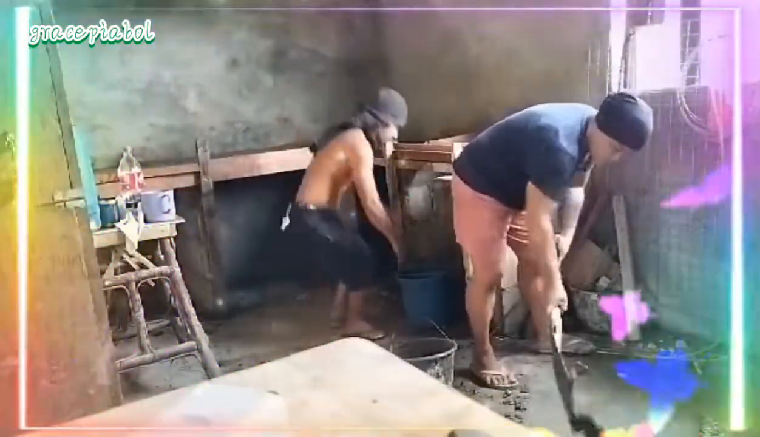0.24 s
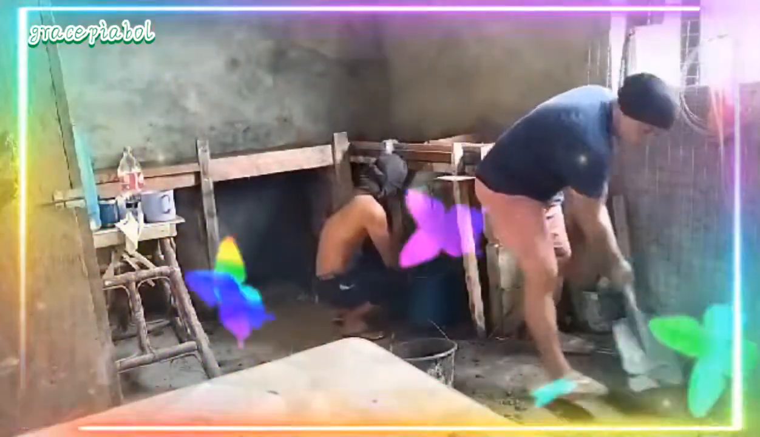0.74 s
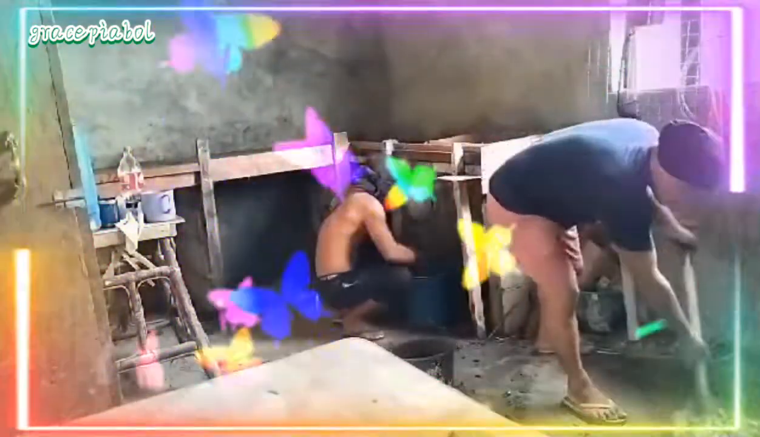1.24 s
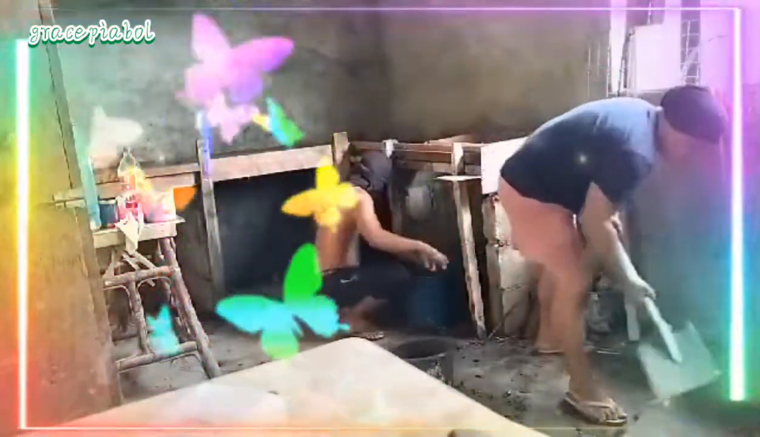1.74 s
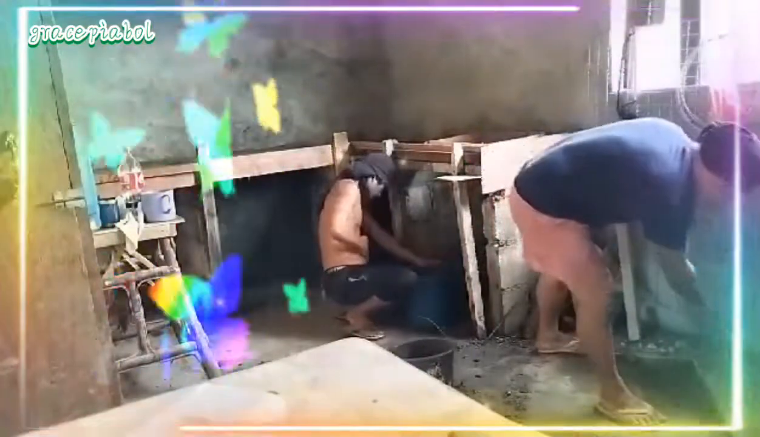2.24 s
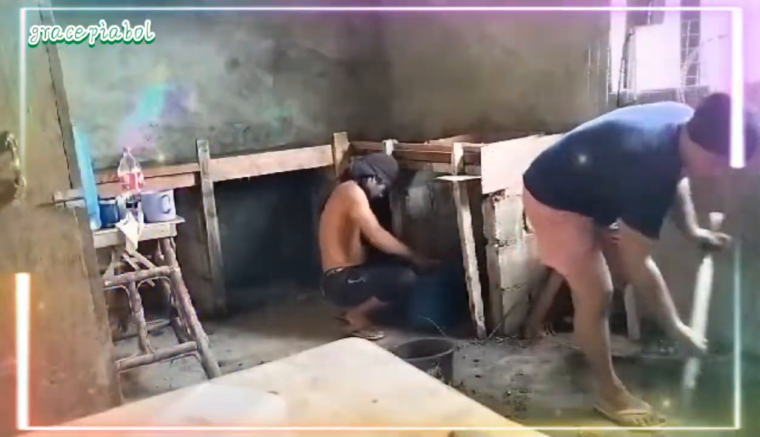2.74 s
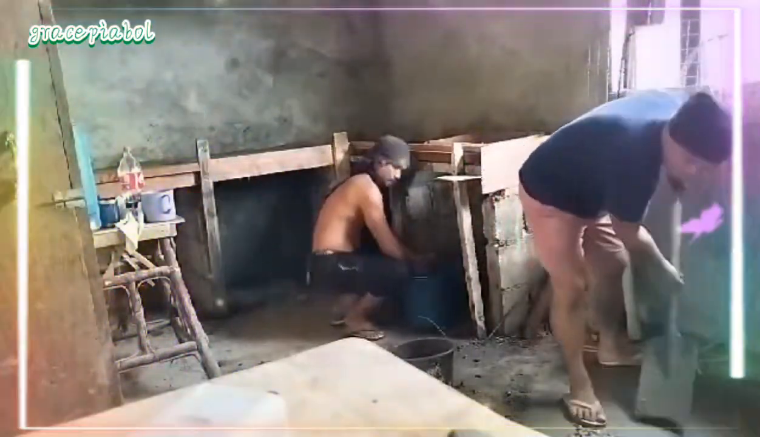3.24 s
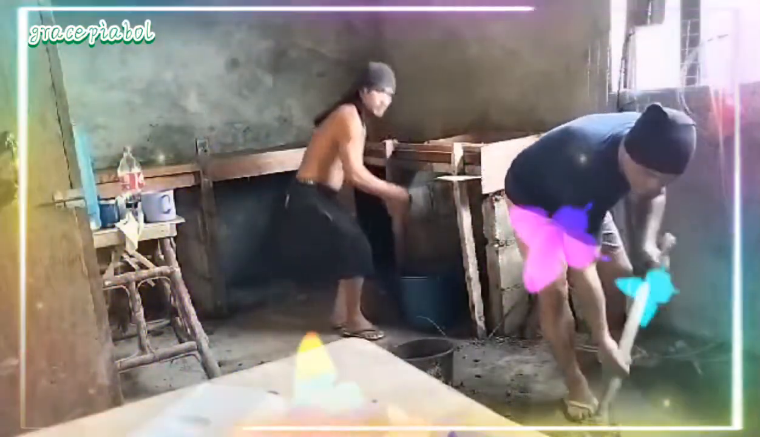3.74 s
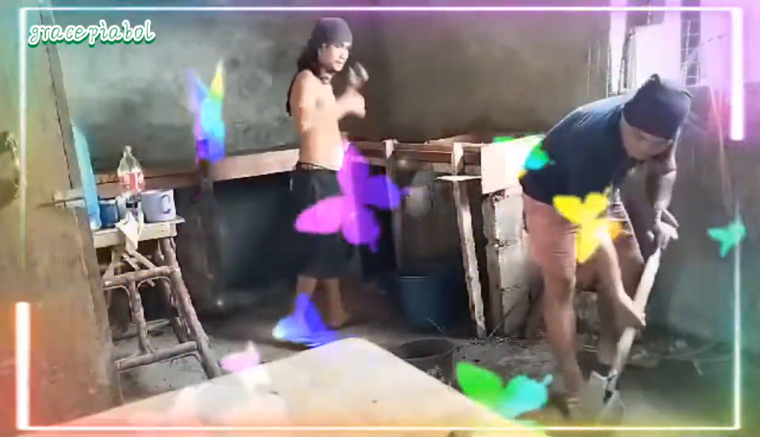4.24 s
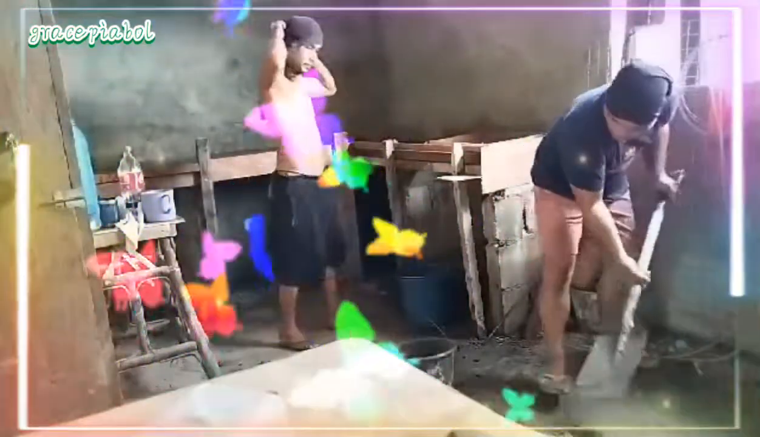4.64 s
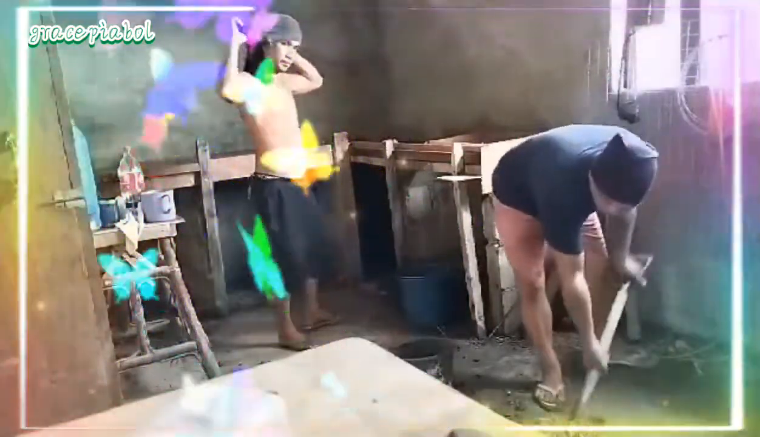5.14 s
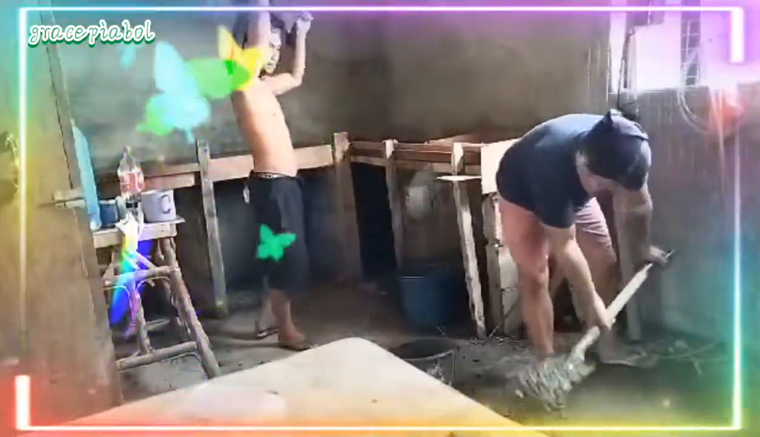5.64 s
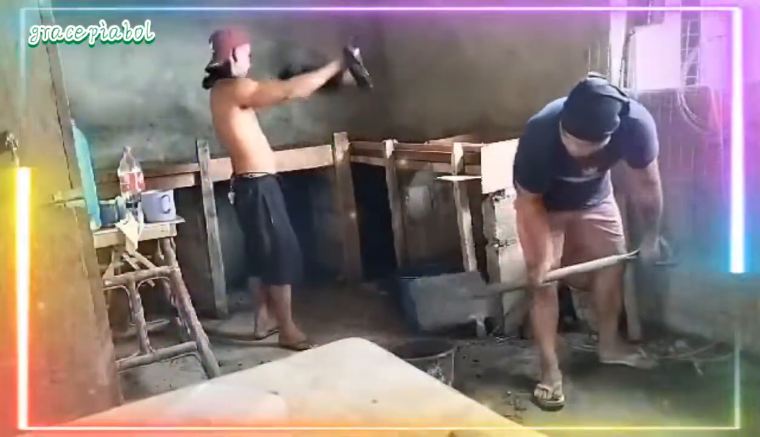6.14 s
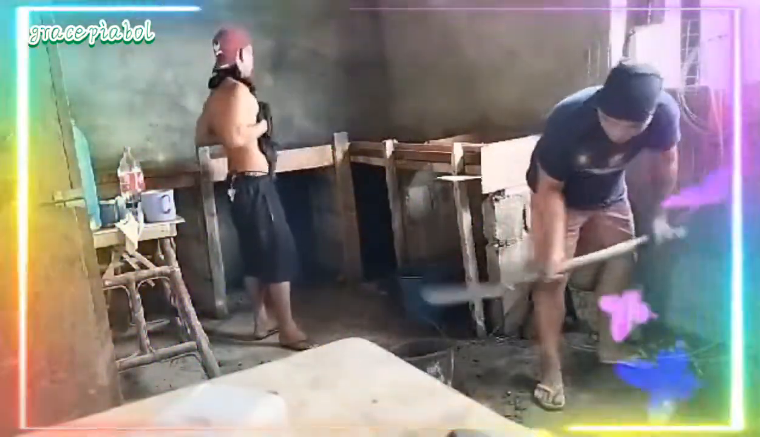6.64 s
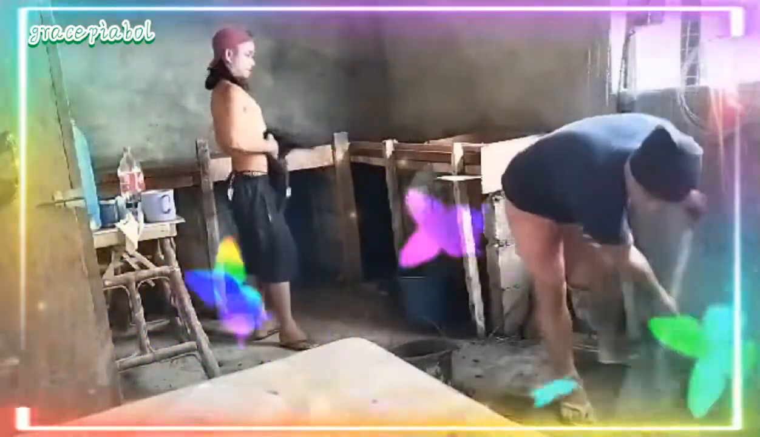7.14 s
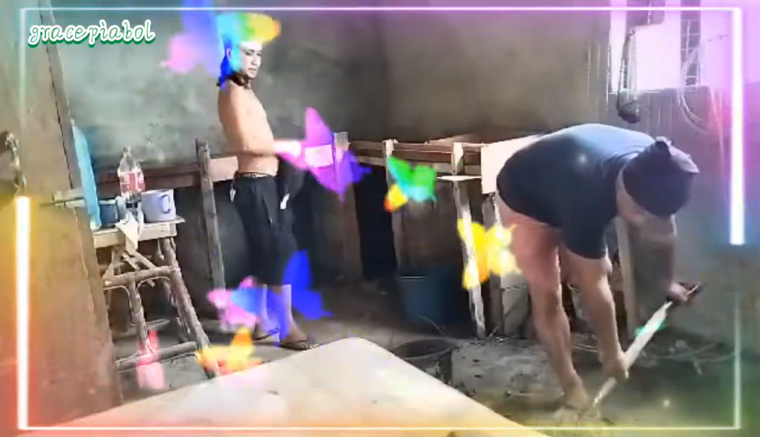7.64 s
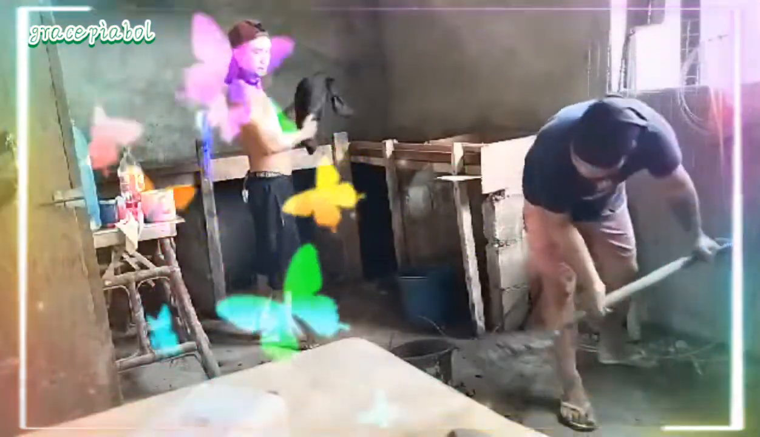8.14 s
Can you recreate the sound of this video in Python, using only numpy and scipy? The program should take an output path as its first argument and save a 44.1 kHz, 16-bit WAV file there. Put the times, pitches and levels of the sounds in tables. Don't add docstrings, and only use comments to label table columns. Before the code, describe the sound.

A steel shovel works wet gravel on concrete inside a small bare room with short, hard reverberation, heard in stereo mostly off the walls. At 0 s a few last stones fall; light chops and small scuffs follow until 0.8. From 0.9 to 1.4 a gritty push rasps, stones snapping, the blade booming downward in pitch. A second scrape comes at 2.0-2.5, then light dragging. At 3.3-3.6 a harder push grinds with a heavy floor thud. At 4.1 comes the hardest, sharpest bite, then at 4.8-5.1 another scrape with sprayed sand. It quiets to faint drags, with a light tap at 5.9. At 6.25-6.4 the load tips with a loud hollow metal clank; at 7.0-7.4 gravel slides in a bright, swelling rasp. Faint scuffs fade to about 8.4. Throughout, a distant low motor wavers, with soft air noise and thin high insect hiss; a second motor rises briefly near 5.7.

```python
import sys
import numpy as np
from scipy import signal
from scipy.io import wavfile
from scipy.ndimage import uniform_filter1d

SR = 44100
rng = np.random.default_rng(int(sys.argv[2]) if len(sys.argv) > 2 else 0)


def generate_wav(signal):
    frames = np.transpose(np.atleast_2d(signal))
    scaled = np.clip(frames, -1, 1) * 32767
    pcm = np.round(scaled).astype(np.int16)
    wavfile.write(sys.argv[1], SR, pcm)


def level_to_linear(level):
    exponent = np.asarray(level, float) / 20
    return 10 ** exponent


N = 370440
T = np.arange(N) / SR
TICKS = T[::44]

# mode_hz, width_hz, level_db
BLADE_MODES = [(211.4, 22, 3), (263.1, 13, 2), (315.4, 10, -3.5), (350.2, 37, 1.5), (406.2, 41, 1.5),
               (456.6, 72, 1.5), (512, 90, 7.5), (562.4, 35, 2.5), (629.6, 58, 9.5), (683.4, 28, 2),
               (776, 25, 8.5), (868, 77, 12.5), (980, 84, 14), (1090, 71, -16.5), (1480, 140, -35.5)]


def shovel():
    # frequency_hz, density_db (per Hz)
    grit_spectrum = [(410, -54.5), (700, -18), (754, -0.5), (943, -2), (1590, -2.5), (2220, -3), (2920, -8),
                     (3600, -6.5), (5560, -14), (5990, -15), (10600, -15), (12900, -16), (13600, -84)]
    # mode_hz, width_hz, level_db
    slab_modes = [(78, 29, -18), (100, 57, -10.5), (132, 49, 11), (169, 18, 3.5)]
    grit_db, fizz_db, lean_db = grit_pressure()
    thud_db = slab_load()
    judder = level_to_linear(0.36 * wander(18) + 1.27 * wander(45) + 2.24 * wander(140))
    sand = slips(3400, spread_db=4.0) * judder
    gravel = slips(1500, spread_db=3.5) * judder

    edge = lip(colour(sand, grit_spectrum))
    grit = level_to_linear(lean_db) * band(edge, 760, 1793) - band(edge, 1755, 5770)
    grit *= level_to_linear(grit_db) / np.std(band(edge, 870, 3400))
    grit += level_to_linear(grit_db - 6.0) * judder * chips(892, 4600, cycles=9)
    fizz_db = np.minimum(fizz_db, -.3 * (grit_db + 36))
    fizz = level_to_linear(grit_db + fizz_db + 0.27 * wander(22.15)) * evened(band(edge, 5140, 14100))

    shake = evened(gravel) + 0.49 * evened(sand)
    blade = np.zeros(N)
    for level, (hz, width, _) in zip(mode_levels(), BLADE_MODES):
        blade += level * evened(ring(ring(shake, hz, 1.4 * width), hz, 4 * width))
    boom = belly(evened(sand / judder) + .3 * shake)
    floor = sum(level_to_linear(db) * ring(shake, hz, width) for hz, width, db in slab_modes)
    thud = level_to_linear(thud_db - 7.5) * evened(band(floor, 60, 212))
    return grit + fizz + blade + boom + thud


def grit_pressure():
    # start_s, rise_s, hold_s, peak_db, hold_end_db
    scrapes = [
        (.901, 0.11, 0.086, -22.5, -26.5),
        (1.06, 0.039, 0.23, -26, -32.5),
        (2.01, 0.16, 0.27, -22.5, -28),
        (3.325, 0.0077, 0.048, -22, -27.5),
        (3.372, 0.0066, 0.2, -15, -30),
        (4.824, 0.0047, 0.034, -23, -37),
        (4.86, 0.067, 0.16, -20.5, -29),
    ]
    # start_s, rise_s, hold_s, peak_db, hold_end_db
    tips = [
        (0, 0.001, 0.0029, -21.5, -37),
        (.11, 0.07, .02, -48, -49.5),
        (6.285, 0.035, 0.0077, -38, -27),
        (6.347, 0.02, 0.034, -25.5, -27),
        (6.48, 0.061, 0.026, -40.5, -53),
    ]
    # start_s, rise_s, hold_s, peak_db, hold_end_db
    chops = [
        (.236, 0.031, 0.05, -35, -39.5),
        (.414, 0.012, 0.054, -41.5, -45),
        (1.768, 0.01, 0.16, -39, -57),
        (1.894, 0.0047, 0.017, -47, -49),
        (2.99, 0.027, 0.29, -34.5, -55.5),
        (4.11, 0.02, 0.034, -21, -24),
        (4.143, 0.011, 0.047, -9, -25),
        (4.59, 0.015, 0.23, -56, -63),
        (5.882, 0.005, 0.0094, -28.5, -42),
    ]
    # start_s, rise_s, hold_s, peak_db, hold_end_db
    scuffs = [
        (.489, 0.003, 0.027, -33.5, -45),
        (.49, .005, 0.17, -42.5, -65),
        (.77, .012, 0.11, -46, -64),
        (3.885, 0.011, 0.013, -32, -40),
        (6.862, 0.019, 0.025, -45, -49.5),
        (7.8, 0.022, 0.045, -43, -47),
        (7.995, 0.0074, 0.1, -49, -61),
    ]
    # start_s, rise_s, hold_s, peak_db, hold_end_db
    drags = [(1.35, 0.088, 0.13, -38.5, -37), (2.43, 0.02, 0.17, -36, -40.5),
             (2.6, 0.063, 0.25, -40.5, -37.5), (3.6, 0.11, 0.46, -39, -38), (5.2, 0.05, 0.17, -50, -51.5),
             (5.45, 0.14, 0.24, -48.5, -51.5), (5.7, 0.047, 0.1, -53.5, -49.5),
             (6.1, 0.08, 0.028, -65, -59.5), (6.6, 0.055, 0.22, -59, -57), (6.93, .03, .06, -57, -48),
             (7.42, 0.058, 1, -46, -76.5)]
    # start_s, rise_s, hold_s, peak_db, hold_end_db
    sprays = [
        (.74, 0.013, 0.047, -46.5, -61.5),
        (1.56, 0.019, 0.034, -41, -42.5),
        (1.85, 0.024, .02, -45, -47.5),
        (3.76, 0.014, 0.044, -32.5, -49),
        (4.89, 0.058, 0.13, -33, -35),
        (6.51, 0.024, 0.038, -40, -49.5),
        (7.87, 0.012, 0.023, -50, -55.5),
    ]
    # start_s, rise_s, hold_s, peak_db, hold_end_db
    dumps = [
        (6.24, 0.0055, 0.026, -40.5, -45.5),
    ]
    # start_s, rise_s, hold_s, peak_db, hold_end_db
    slides = [
        (7.018, 0.054, 0.02, -33.5, -36),
        (7.058, 0.044, 0.068, -24.5, -24),
        (7.14, 0.063, 0.15, -21, -30),
    ]
    parts = [
        contact(scrapes, bite_db=9.9, release_db_per_s=170, fizz_db=-7, lean_db=0.48, drift_db_per_s=11),
        contact(tips, bite_db=1.9, release_db_per_s=144, fizz_db=-10, lean_db=6.4, drift_db_per_s=4),
        contact(chops, bite_db=4.8, release_db_per_s=136, fizz_db=-14, lean_db=-6, drift_db_per_s=-16.5),
        contact(scuffs, bite_db=4, release_db_per_s=270, fizz_db=-6, lean_db=-1.5, drift_db_per_s=-10),
        contact(drags, bite_db=7.1, release_db_per_s=91, fizz_db=-9, lean_db=6, drift_db_per_s=-16),
        contact(sprays, bite_db=8.8, release_db_per_s=121, fizz_db=3.5, lean_db=2.5, drift_db_per_s=-2),
        contact(dumps, bite_db=7.8, release_db_per_s=150, fizz_db=-14.5, lean_db=17, drift_db_per_s=-0.6),
        contact(slides, bite_db=9, release_db_per_s=225, fizz_db=-7, lean_db=-3.5, drift_db_per_s=33),
    ]
    power, fizz, lean = np.concatenate(parts, axis=1)
    return blend(power, -72.5, fizz, lean)


def contact(rows, bite_db, release_db_per_s, fizz_db, lean_db, drift_db_per_s):
    rows = np.array(rows)
    sag_db_per_s = (rows[:, 3] - rows[:, 4]) / rows[:, 2]
    power, since = efforts(rows, bite_db, sag_db_per_s[:, None], release_db_per_s)
    return power, fizz_db + 0 * power, lean_db + drift_db_per_s * since


def mode_levels():
    # start_s, rise_s, hold_s, peak_db, centre_hz
    rattles = [(0, 0.0018, .005, -33.5, 520), (.23, 0.062, .012, -40, 606), (.901, 0.0029, 0.18, -26, 480),
               (1.05, 0.044, 0.2, -25, 566), (1.42, 0.044, 0.24, -38.5, 480), (2.01, 0.23, 0.3, -26, 476),
               (2.58, 0.025, 0.6, -33, 415), (3.33, 0.086, 0.12, -21.5, 470),
               (3.62, 0.014, 0.14, -32.5, 296), (3.78, 0.049, 0.23, -36.5, 467),
               (4.114, 0.023, 0.017, -20, 450), (4.824, 0.13, 0.14, -25.5, 510),
               (5.87, 0.015, 0.0054, -44.5, 400), (6.237, 0.0071, 0.02, -27.5, 493),
               (6.345, 0.005, 0.014, -13, 560), (6.5, 0.024, 0.15, -43, 435), (7.08, 0.17, 0.1, -26, 544),
               (6.965, 0.0066, 0.094, -39, 396), (1.85, 0.017, 0.17, -47, 326), (5.45, .05, 0.37, -46, 472),
               (7.65, 0.043, 0.064, -44, 483)]
    # start_s, rise_s, hold_s, peak_db, centre_hz
    booms = [(1.11, 0.042, 0.05, -27, 770), (1.132, .01, .06, -25.5, 500), (6.258, .008, 0.018, -25.5, 400),
             (4.145, .01, .05, -24, 200), (3.39, 0.015, 0.04, -24, 830), (3.455, 0.012, 0.071, -17.5, 334),
             (6.355, .012, 0.051, -14.5, 640), (7.19, 0.048, 0.036, -30, 800),
             (4.13, 0.032, 0.023, -27, 220), (7.03, 0.056, 0.065, -36, 215),
             (0.968, 0.027, 0.072, -30, 268), (2.06, 0.041, 0.13, -31.5, 270),
             (4.92, 0.042, 0.174, -33.5, 336), (6.35, 0.012, 0.029, -11, 454)]
    # start_s, rise_s, hold_s, peak_db, centre_hz
    hums = [
        (8.1, 0.2, .15, -71, 568.1),
    ]
    mode_hz, _, mode_db = np.transpose(BLADE_MODES)[..., None, None]
    modes = level_to_linear(2 * -64) / len(BLADE_MODES)

    def excited(rows, bite_db, sag_db_per_s, release_db_per_s, spread, glide_per_s):
        rows = np.array(rows)
        power, since = efforts(rows, bite_db, sag_db_per_s, release_db_per_s)
        away = np.log(mode_hz / rows[:, 4:]) - glide_per_s * since
        reach = (level_to_linear(mode_db) * (.015 + np.exp(-(away / spread) ** 2))) ** 2
        return (power * reach / reach.sum(0)).sum(1)

    modes = modes + excited(rattles, 7.5, 34, 153, spread=.5, glide_per_s=-0.15)
    modes = modes + excited(booms, 9.6, 100, 220, spread=.12, glide_per_s=-1.1)
    modes = modes + excited(hums, 6.4, 102, 130, spread=.15, glide_per_s=-.1)
    return [np.interp(T, TICKS, level) for level in np.sqrt(modes)]


def slab_load():
    # start_s, rise_s, hold_s, peak_db
    thuds = [(0.167, 0.025, 0.023, -49), (0.903, 0.0042, 0.34, -31.5), (1.36, 0.023, .02, -44),
             (1.997, .012, .02, -39.5), (2.158, 0.055, 0.22, -32), (3.383, 0.08, 0.032, -19),
             (4.128, 0.029, 0.03, -21.5), (4.81, 0.02, .012, -38), (4.985, 0.042, .09, -40),
             (6.346, .012, 0.011, -31), (6.38, .02, 0.19, -42), (6.99, 0.13, .03, -38),
             (7.23, 0.056, 0.016, -31.5)]
    power, _ = efforts(np.array(thuds), bite_db=16, sag_db_per_s=4, release_db_per_s=156)
    return blend(power, -56)[0]


def efforts(rows, bite_db, sag_db_per_s, release_db_per_s):
    start, rise, hold, peak_db = rows[:, :4].T[..., None]
    since = TICKS - start
    down_db = bite_db * np.clip(1 - since / rise, 0, 1)
    down_db = down_db + sag_db_per_s * np.clip(since - rise, 0, hold)
    down_db += release_db_per_s * np.maximum(since - rise - hold, 0)
    down_db += 5000 * np.maximum(-since, 0)
    return level_to_linear(-2 * np.minimum(down_db - peak_db, 150)), np.clip(since, 0, rise + hold)


def blend(power, rest_db, *traits):
    total = power.sum(0)
    curves = [10 * np.log10(total + level_to_linear(2 * rest_db))]
    curves += [(power * trait).sum(0) / total for trait in traits]
    return [np.interp(T, TICKS, curve) for curve in curves]


def lip(edge):
    # time_s, pitch_hz, share
    lip_path = [(0, 2640, 0.19), (.95, 2700, 0.38), (1.15, 2390, 0.37), (1.4, 2300, 0.77),
                (2.1, 2560, 0.37), (2.3, 2300, 0.36), (3.0, 2520, 0.29), (3.4, 2320, 0.6),
                (3.6, 2300, 0.26), (4.15, 2850, 0.74), (4.3, 2750, 0.63), (4.9, 2250, 0.43),
                (5.9, 2760, 0.63), (6.4, 2000, 0.27), (7.07, 2610, 1.3), (7.22, 2200, 1.5),
                (7.45, 2300, 0.47), (8.4, 2410, 0.22)]
    time_s, pitch_hz, share = np.transpose(lip_path)
    turn = np.exp(2j * np.pi * np.cumsum(np.interp(T, time_s, pitch_hz)) / SR)
    keep = np.exp(-np.pi * 700 / SR)
    sung = (turn * signal.lfilter([1 - keep], [1, -keep], edge / turn)).real
    return edge + 2 * np.interp(T, time_s, share) * sung


def chips(lo_hz, hi_hz, cycles):
    pitches = np.geomspace(lo_hz, hi_hz, num=12)
    return evened(sum(evened(ring(slips(45, spread_db=3.0), hz, hz / cycles)) for hz in pitches))


def belly(shake):
    # time_s, pitch_hz, level_db
    strokes = [
        [(1.1, 531, -31), (1.2, 507, -23), (1.21, 497, -17), (1.294, 446, -29), (1.328, 405, -25.5),
         (1.418, 408, -42), (1.45, 488, -44)],
        [(2.25, 537, -35), (2.3, 600, -46), (2.324, 575, -26), (2.366, 434, -27.5), (2.472, 435, -26),
         (2.544, 416, -34), (2.574, 372, -40), (2.6, 419, -37)],
        [(3.42, 502, -23), (3.432, 499, -24), (3.456, 396, -20), (3.48, 392, -19), (3.538, 437, -17.5),
         (3.584, 389, -27), (3.65, 398, -56)],
        [(5.0, 594, -43), (5.06, 487, -26), (5.138, 461, -29.5), (5.162, 406, -42), (5.252, 422, -43),
         (5.32, 386, -37.5), (5.416, 412, -37), (5.55, 450, -64)],
        [(7.15, 410, -31), (7.19, 525, -27), (7.222, 581, -32.5), (7.3, 510, -16.5), (7.438, 430, -40),
         (7.476, 369, -35), (7.574, 371, -36), (7.7, 430, -57)],
    ]
    padded = []
    for path in strokes:
        first, last = path[0], path[-1]
        padded += [(first[0] - .02, first[1], -80), *path, (last[0] + .03, last[1], -80)]
    time_s, pitch_hz, level_db = np.transpose(padded)
    turn = np.exp(2j * np.pi * np.cumsum(np.interp(T, time_s, pitch_hz)) / SR)
    keep = np.exp(-np.pi * 86 / SR)
    slow = signal.lfilter([1], np.convolve([1, -keep], [1, -keep ** 3]), shake / turn)
    return level_to_linear(np.interp(T, time_s, level_db) - 3) * evened((turn * slow).real)


def knocks(rows, soft_cycles, snap):
    out, t = np.zeros(N), T[:8000]
    for start_s, peak_db, hz, t60 in rows:
        tone = np.sin(2 * np.pi * hz * t) + 0.16 * np.sin(2 * np.pi * 0.89 * hz * t)
        tone *= level_to_linear(-60 * t / max(t60, .01)) * np.minimum(t * hz / soft_cycles, 1)
        crack = rng.standard_normal(len(t)) * np.exp(-t / .005)
        crack = band(crack, 150, min(3.76 * hz, 12000))
        part = out[round(start_s * SR):][:len(t)]
        part += level_to_linear(peak_db + 1.0) * (.9 * tone + snap * crack)[:len(part)]
    return band(out, 150, 11000)


def shed(x):
    # frequency_hz, t60_s
    wall_decay = [(100, 0.27), (400, 0.34), (2000, 0.28), (6000, 0.25), (13000, 0.073)]
    wet, t = np.zeros((2, N)), np.arange(200) * 128 / SR
    for place in range(3):
        hz, z = pair(200, 512)
        hz, t60 = hz[:, None], read(wall_decay, hz)[:, None]
        decay = level_to_linear(2.82 * np.log2(1 + hz / 3000) - 60 * t / t60) / np.sqrt(t60)
        tail = signal.istft(z * decay, nperseg=512, noverlap=384)[1]
        tail = tail * np.minimum(np.arange(tail.shape[1]) / 150, 1)
        here = np.sqrt(2 / 3) * np.cos(2 * np.pi * (4.7 * T + place / 3))
        wet += signal.fftconvolve((x * here)[None], tail / np.linalg.norm(tail[0]), axes=1)[:, :N]
    late = np.interp(T - (14 + 3 * wander(2.1)) / SR, T, x)
    direct = band(np.array([level_to_linear(-1.0) * late, x]), 30, 14000)
    return level_to_linear(-0.27) * direct + level_to_linear(2.0) * wet


def outside():
    return air() + motors() + insects()


def air():
    # frequency_hz, density_db (per Hz)
    air_spectrum = [(12, -35), (20, -16), (139, -1), (215, -56.5), (246, -17), (342, -11), (529, -4),
                    (574, -11.5), (714, -10), (841, -29), (964, -13), (1050, -21.5), (7260, -36.5),
                    (10400, -18), (13600, -41)]
    hz, z = pair(N // 256 + 5, 1024)
    patches = rng.standard_normal(z.shape[:0:-1]).T
    patches = evened(uniform_filter1d(uniform_filter1d(patches, 10, 0), 14, 1))
    z = z * level_to_linear(read(air_spectrum, hz)[:, None] + 2.9 * patches)
    return level_to_linear(-51) * evened(signal.istft(z, nperseg=1024, noverlap=768)[1][:, :N])


def motors():
    # time_s, level_db
    drone_path = [(0, -72), (.7, -60), (.9, -53), (1.5, -62), (1.9, -52), (2.6, -53.5), (3.1, -51),
                  (3.4, -51), (3.9, -58.5), (4.4, -54.5), (4.8, -46.5), (5.1, -56), (5.8, -63.5),
                  (6.6, -63), (7.0, -55), (7.6, -64), (8.4, -59.5)]
    phase = 2 * np.pi * np.cumsum(133.3 * (1 + 0.0059 * wander(6.8))) / SR
    drone = np.sin(phase) + level_to_linear(-27) * np.sin(2 * phase)
    drone *= level_to_linear(np.interp(T, *np.transpose(drone_path)) + 3.5 + 4 * wander(18))
    passing = np.sin(2 * np.pi * np.cumsum(np.interp(T, [5.2, 6.2], [165, 188])) / SR)
    swell = np.exp(-((T - 5.75) / .5) ** 4)
    return drone + level_to_linear(-59 + 3 * wander(7.1)) * passing * swell


def insects():
    hz, width_hz = 10650, 380
    chirr = ring(ring(rng.standard_normal((2, N)), hz, width_hz), hz, 2 * width_hz)
    return level_to_linear(-64.5 + 1.5 * wander(7.3)) * evened(chirr)


def pair(frames, size):
    # frequency_hz, likeness
    likeness = [(30, 0.74), (70, 1), (140, 0.43), (300, 1), (550, 0.2), (1300, 0.15), (2800, 0.058),
                (13000, 0.0053)]
    hz = np.fft.rfftfreq(size, 1 / SR)
    a, b, c, d = rng.standard_normal((frames, len(hz), 4)).T
    same, left = read(likeness, hz)[:, None], a + 1j * b
    right = same * left + np.sqrt(1 - same ** 2) * (c + 1j * d)
    return hz, np.array([left, right])


def slips(per_s, spread_db):
    hit, size, sign = rng.random((3, N))
    height = level_to_linear(spread_db * np.minimum(-np.log(size + 1e-9), 5))
    return (hit < per_s / SR) * height * np.sign(sign - .5)


def wander(rate_hz):
    return np.interp(T * rate_hz, np.arange(2000), rng.standard_normal(2000))


def evened(x):
    return x / np.sqrt(np.mean(x ** 2) + 1e-20)


def read(points, hz):
    f, value = np.transpose(points)
    return np.interp(np.log(hz + 1), np.log(f + 1), value)


def ring(x, hz, width):
    return signal.lfilter(*signal.iirpeak(hz, hz / width, SR), x)


def band(x, lo_hz, hi_hz):
    return signal.sosfilt(signal.butter(3, [lo_hz, hi_hz], "bandpass", fs=SR, output="sos"), x)


def colour(x, points):
    gain_db = np.maximum(read(points, abs(np.fft.fftfreq(4096, 1 / SR))), -70)
    taps = np.fft.ifft(np.exp(np.conj(signal.hilbert(np.log(level_to_linear(gain_db)))))).real[:2048]
    return signal.oaconvolve(x, taps)[:N]


def scene():
    # start_s, peak_db, pitch_hz, t60_s
    knock_rows = [(.906, -6, 1850, 0.0079), (.965, -18, 2710, 0.051), (1.0, -14, 2570, 0.035),
                  (1.025, -8.5, 1046, .029), (1.198, -15, 500, 0.037), (1.32, -14, 398, 0.08),
                  (3.482, -9, 450, 0.036), (3.525, -13, 460, 0.043), (2.128, -16, 2530, .02),
                  (2.21, -4.5, 2140, 0.012), (2.455, -20, 424, 0.033), (3.029, -19.5, 2610, 0.017),
                  (3.334, -17, 3380, .015), (3.385, -5, 2050, 0.0086), (3.89, -30, 2200, .015),
                  (4.018, -30, 2700, .015), (4.146, -10, 453, 0.039), (4.15, -18, 2800, .02),
                  (4.17, -4.5, 480, .03), (4.19, -6.5, 2580, 0.021), (4.829, -19, 2270, 0.013),
                  (5.405, -37, 412, .04), (5.886, -32, 2880, 0.028), (6.24, -19.5, 412, 0.069),
                  (6.243, -17, 1310, .03), (6.247, -19, 1850, .025), (6.256, -19, 900, .04),
                  (6.345, -6, 712, 0.098), (6.372, 1.5, 720, 0.04), (7.021, -26, 1390, 0.056),
                  (7.285, -22, 530, 0.035), (7.505, -23, 371, 0.06), (7.55, -30, 384, 0.092)]
    # start_s, peak_db, pitch_hz, t60_s
    ping_rows = [
        (.772, -33, 1340, .09),
    ]
    # start_s, peak_db, pitch_hz, t60_s
    snap_rows = [(.4905, -27, 3400, .012), (.4975, -30, 3600, .012), (.518, -34, 3520, .012),
                 (.427, -42, 2600, .04), (.9527, -19, 1950, .012), (.9891, -11, 2620, 0.013),
                 (1.027, -13, 2380, .01), (2.0677, -31, 3450, .012), (2.178, -18, 2200, .012),
                 (2.292, -16, 2180, .012), (1.211, -3, 508, .045), (3.7533, -16, 1230, 0.017),
                 (4.1245, -12, 1970, 0.015), (4.1585, -12, 2800, .015), (4.2, -18, 2880, .02),
                 (4.212, -17, 3000, 0.026), (4.942, -10, 2280, .015), (5.0339, -14, 1500, 0.015),
                 (5.886, -38, 2180, 0.017), (7.0527, -29, 1370, 0.024), (7.0637, -25, 2770, .03),
                 (7.1006, -14, 2280, .015), (7.165, -15, 2200, .02), (7.21, -13, 2060, .02),
                 (7.2702, -9, 2350, 0.013)]
    ping = knocks(ping_rows, soft_cycles=16, snap=.02)
    snaps = knocks(snap_rows, soft_cycles=1.77, snap=.5)
    hits = knocks(knock_rows, soft_cycles=1.77, snap=.3)
    inside = shed(shovel() + hits + .5 * ping + .6 * snaps)
    return inside + ping + .4 * snaps + outside()


def thinned(x):
    hz, _, z = signal.stft(x, SR, nperseg=1024)
    luck = rng.standard_normal((z.shape[2], 50)).T
    luck = evened(uniform_filter1d(luck, size=6, axis=1))[np.minimum(hz // 430, 49).astype(int)]
    level_db = 10 * np.log10((abs(z[:, 80:]) ** 2).mean((0, 1)) + 1e-14)
    fading = np.clip(-uniform_filter1d(np.gradient(level_db), size=5), -1, 3)
    bar = read([(2500, 3.2), (4500, 1.6), (6000, .95), (9800, 1.1), (10600, 1.9), (11800, .7), (13000, .9)], hz)
    bar = bar[:, None] - .2 * fading
    treble = np.clip(hz[:, None] / 5000, 0, 1) ** 2
    weak = abs(z) ** 2 < .8 * uniform_filter1d(abs(z) ** 2, size=12, axis=1)
    loss_db = treble * (1.8 * luck + 9 * weak) + 45 * (luck > bar)
    return signal.istft(z * level_to_linear(-loss_db), SR, nperseg=1024)[1][:, :N]


def band_limit(x):
    return signal.sosfilt(signal.butter(12, 13780, fs=SR, output="sos"), x)


def record(dry):
    mix = thinned(.97 * np.tanh(dry / .97))
    low_pass = signal.firwin(1023, 13150, window=("kaiser", 9), fs=SR)
    mix = signal.oaconvolve(mix, low_pass[None], "same")
    return band_limit(mix)


dry = scene()
out = record(dry)
generate_wav(out)
```